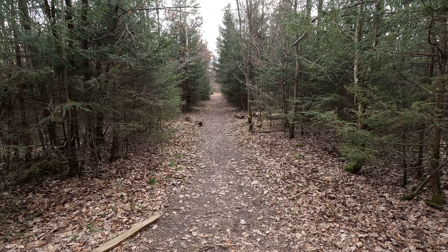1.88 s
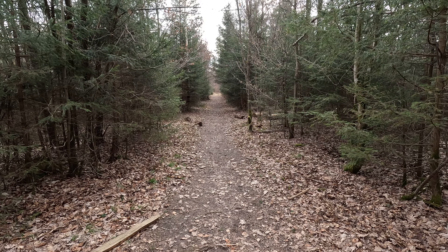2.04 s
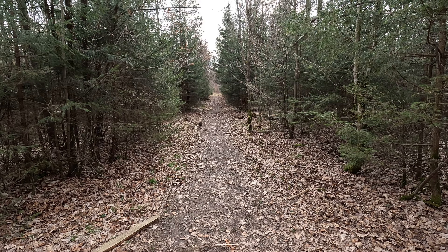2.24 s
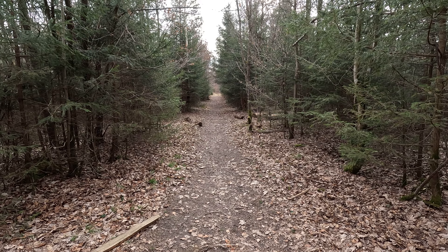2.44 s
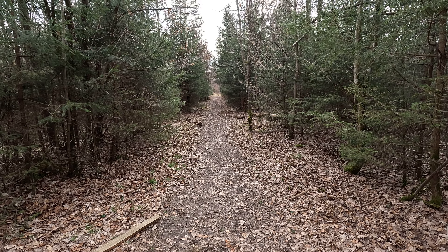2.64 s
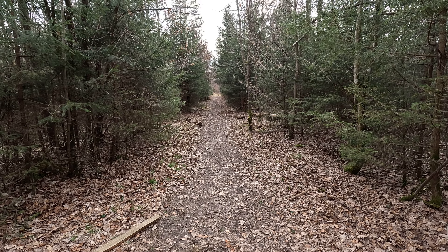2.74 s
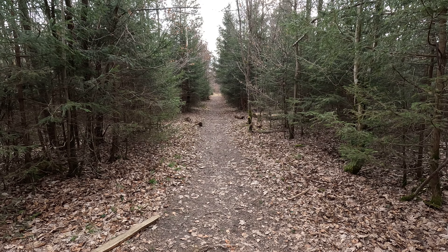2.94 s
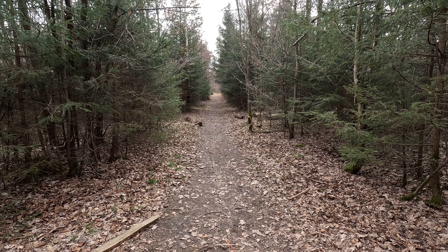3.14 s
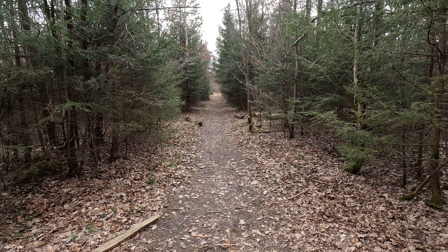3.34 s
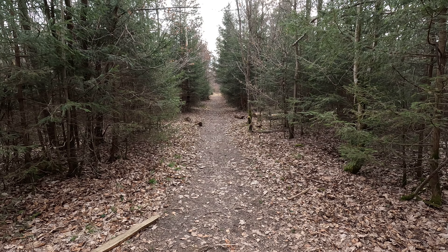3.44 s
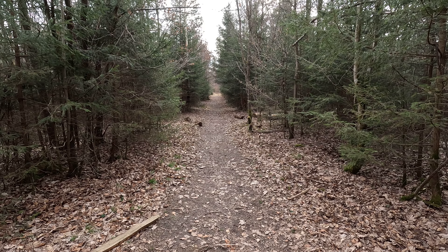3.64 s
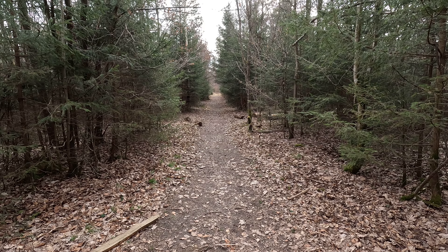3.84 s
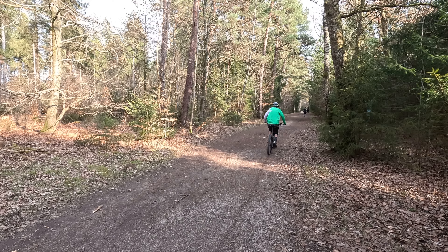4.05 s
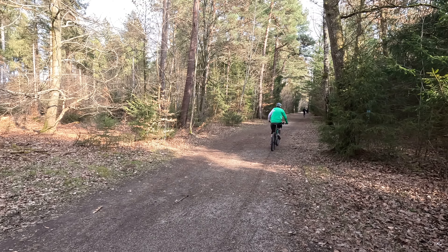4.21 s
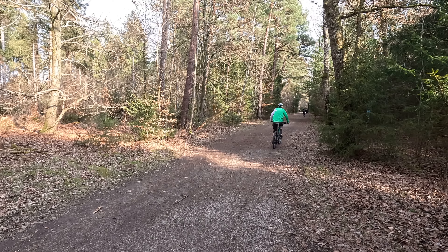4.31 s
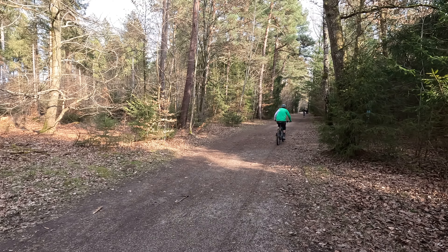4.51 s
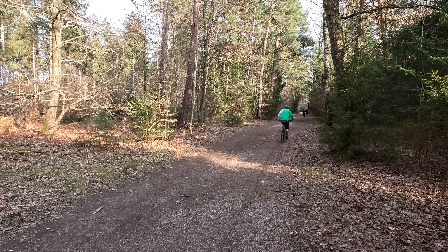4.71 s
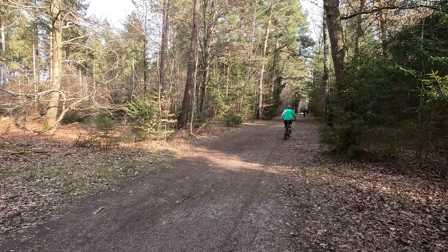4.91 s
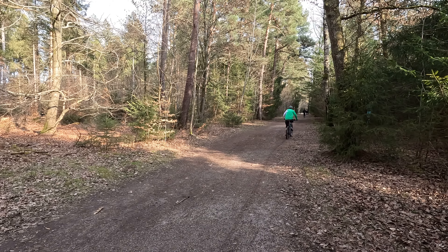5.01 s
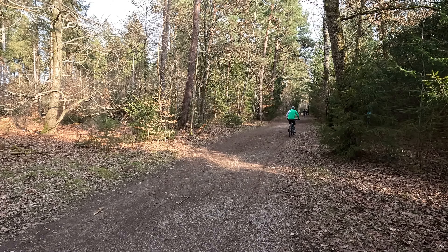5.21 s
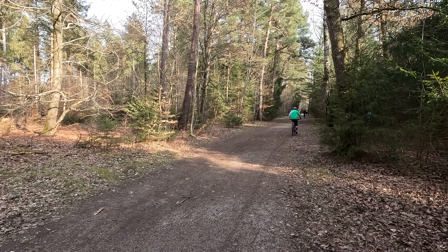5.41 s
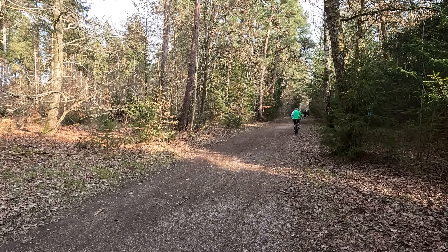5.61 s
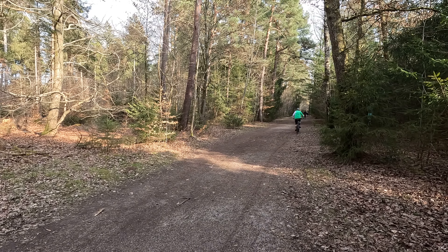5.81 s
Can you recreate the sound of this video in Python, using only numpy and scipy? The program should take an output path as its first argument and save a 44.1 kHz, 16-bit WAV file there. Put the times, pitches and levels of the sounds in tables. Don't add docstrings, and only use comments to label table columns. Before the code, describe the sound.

Woodland birds trill and whistle over soft wind and a distant drone, then a bicycle crunches away over loud gravel.

```python
import sys
import numpy as np
from scipy import signal
from scipy.fft import rfft, irfft, next_fast_len
from scipy.io import wavfile
from scipy.ndimage import uniform_filter1d, map_coordinates

SR = 44100
rng = np.random.default_rng(int(sys.argv[2]) if len(sys.argv) > 2 else 0)


def linear_from_db(decibels):
    return 10 ** (np.asarray(decibels, float) / 20)


def output_pcm(signal):
    pcm = np.clip(np.atleast_2d(signal).T, -1, 1) * 32767
    wavfile.write(sys.argv[1], SR, np.round(pcm).astype(np.int16))


N = 258867

# (frequency [Hz], density [dB per Hz])
WIND_SPECTRUM = [(12, -21), (20, 5), (38, -3.5), (54, -1.5), (68, -9.5), (110, -16), (140, -39),
                 (240, -120)]
# (frequency [Hz], density [dB per Hz])
DRONE_SPECTRUM = [(53, -51), (90, -25), (119, -19.5), (148, -7), (182, 2), (330, -15.5), (430, -55),
                  (730, -120)]
# (frequency [Hz], density [dB per Hz])
WHIRR_SPECTRUM = [(160, -25), (270, 2.5), (297, -5.5), (387, -3), (517, -13.5), (800, -29.5), (1040, -67.5),
                  (1760, -120)]
# (frequency [Hz], density [dB per Hz])
AIR_SPECTRUM = [(500, -19), (700, -10), (850, -11), (1030, -3), (1400, -4), (2000, -2), (3000, -19.5),
                (4000, -25), (5700, -22.5), (7600, -25.5), (9000, -36.5), (12000, -41.5), (14500, -62),
                (16000, -120)]
# (frequency [Hz], density [dB per Hz])
LEAF_SPECTRUM = [(900, -22), (2500, -2.5), (5000, -1), (7500, -13), (10000, -25), (14000, -39.5)]
# (time [s], rise [dB])
GUSTS = [(.2, 4.5), (1.1, 5), (1.29, 13.5), (1.5, 11.5), (1.7, 7), (1.9, 4), (2.33, 6), (2.76, 10.5),
         (3.0, 4.5), (3.33, 9.5), (3.58, 9), (3.84, 6)]
# (time [s], level [dB])
DRONE_LEVEL = [(0, -63.5), (.25, -58), (.9, -51.5), (1.27, -59.5), (1.8, -53), (2.2, -53), (2.7, -52.5),
               (3.3, -56), (3.45, -59), (3.7, -60.5), (4.05, -55)]
# (time [s], length [s], level [dB])
LEAF_STIRS = [
    (0.666, 0.095, -70),
    (1.22, .06, -78),
    (2.767, 0.14, -75),
]
# (frequency [Hz], left-right correlation [0..1])
LIKENESS = [(60, 0.97), (240, 0.96), (490, 0.8), (990, 0.75), (2000, 0.25), (8000, 0.8)]
# (frequency [Hz], t60 [s])
TRUNK_T60 = [(1500, 0.92), (4000, 0.73), (8000, 0.46), (13000, 0.35)]

# (start [s], end [s], first pitch [Hz], last pitch [Hz], level [dB])
FAR_WARBLES = [(.9, 1.072, 1956, 2060, -72), (1.15, 1.33, 2710, 2760, -71.5),
               (1.196, 1.34, 2940, 2880, -72), (1.14, 1.385, 2424, 2520, -72),
               (1.474, 1.531, 2352, 1963, -68.5), (1.5, 1.724, 2193, 2038, -71),
               (2.081, 2.183, 1599, 1867, -67), (2.16, 2.209, 5690, 4350, -74.5),
               (2.243, 2.426, 2207, 2170, -72.5), (2.359, 2.476, 2396, 2387, -71),
               (2.428, 2.53, 6880, 6090, -80), (2.592, 2.75, 6620, 6000, -85.5),
               (3.201, 3.466, 1876, 1783, -69.5), (3.451, 3.557, 2186, 2310, -70.5),
               (3.66, 3.717, 2345, 2514, -63.5), (3.932, 4.05, 3920, 3740, -80.5),
               (2.0, 2.15, 524.5, 547, -72), (3.741, 3.855, 2600, 2930, -70), (3.499, 3.6, 2690, 2680, -70),
               (3.56, 3.705, 3260, 3350, -82), (3.6, 3.72, 2960, 3000, -75.5),
               (3.78, 3.86, 3130, 3050, -79), (3.55, 3.656, 1887, 2066, -62.5),
               (3.79, 3.867, 2756, 2644, -68)]
# (start [s], end [s], first pitch [Hz], last pitch [Hz], level [dB])
FAR_WHISTLES = [(.66, .73, 2020, 1970, -77), (.745, .82, 1970, 1965, -70), (.83, .885, 1950, 1970, -71),
                (.9, 1.1, 2040, 2130, -73), (1.95, 2.2, 505, 560, -76), (2.17, 2.26, 735, 750, -77),
                (.74, .78, 2300, 2640, -77), (.78, .885, 2665, 2670, -75), (.895, 1.065, 2660, 2645, -72),
                (1.49, 1.62, 2290, 2150, -74), (1.5, 1.72, 2050, 1990, -75), (.84, 1.0, 4910, 4880, -78),
                (1.3, 1.52, 5330, 5450, -71), (2.62, 2.77, 1985, 1950, -65.5),
                (2.82, 3.02, 2460, 2540, -75.5), (3.08, 3.2, 1905, 1890, -75), (3.76, 3.8, 3500, 3490, -75),
                (3.95, 4.01, 4490, 4490, -76), (3.715, 3.755, 2500, 2540, -63),
                (3.75, 3.825, 2660, 2810, -65), (3.52, 3.625, 2730, 2690, -72)]
# (time [s], pitch [Hz], level [dB])
THRUSH_NOTES = [
    [(3.655, 2289, -67), (3.679, 2198, -60), (3.717, 2146, -51), (3.741, 2133, -64), (3.751, 2140, -53),
     (3.891, 2070, -53), (3.915, 2085, -66)],
    [(3.94, 2116, -75), (3.946, 2276, -66), (3.956, 2276, -52.5), (3.986, 2266, -50), (4.0, 2170, -49),
     (4.056, 2148, -47.5), (4.062, 2121, -63)],
]
# (start [s], end [s], first pitch [Hz], last pitch [Hz], level [dB])
CREST_BURSTS = [
    (2.331, 2.423, 7450, 7950, -77),
    (2.508, 2.625, 7290, 8340, -69.5),
    (2.679, 2.798, 7860, 7980, -71.5),
    (2.831, 2.931, 7400, 7340, -69.5),
]
# (time [s], height [Hz])
CREST_FLICKS = [(2.368, 447), (2.397, 447), (2.409, 450), (2.508, 1050), (2.547, 1035), (2.582, 940),
                (2.611, 302), (2.684, 745), (2.729, 690), (2.762, 303), (2.838, 600), (2.85, 552),
                (2.884, 596), (2.913, 400)]
# (time after start [s], pitch [Hz], level [dB])
TIT_MOTIF = [
    [(-.02, 5154, -1.5), (.02, 5230, 2), (.08, 5242, 2), (.135, 5254, -1), (.147, 5870, -3)],
    [(.218, 6030, -12), (.228, 4960, 2.5), (.25, 3260, -12), (.262, 2900, -22)],
    [(.298, 3350, -13), (.315, 4360, 0), (.333, 5130, 3), (.341, 6120, -6)],
]
# (start [s], level [dB])
TIT_STARTS = [
    (0.364, -69.5),
    (0.795, -66),
    (1.222, -65.5),
    (1.661, -66.5),
]
# (time [s], pitch [Hz], level [dB])
TIT_LAST = [
    [(3.89, 5170, -68), (3.915, 4950, -65.5), (3.93, 5880, -75)],
    [(3.998, 5200, -68.5), (4.02, 4270, -71), (4.03, 3900, -71.5)],
]
# (time [s], pitch [Hz], level [dB])
LOW_NOTE_TAIL = [(-.01, 3007, -52), (.004, 3054, -49.5), (.009, 2810, -49.5), (0.014, 2220, -58.5)]
# (time after start [s], pitch [Hz], level [dB])
PEAKED_NOTE = [(0, 2300, -17), (.008, 2980, -9), (.0135, 3730, -2), (.021, 3830, 0), (.0265, 3740, -1.5),
               (.032, 2850, -7), (.038, 2250, -16)]
# (time after start [s], pitch [Hz], level [dB])
SQUEAK_NOTE = [(-.002, 3820, -24.5), (.004, 3890, -9), (.012, 4500, -13.5)]
# (start [s], level [dB], squeak re note [dB], top pitch [Hz])
TRILL_NOTES = [
    (.039, -43.5, 2.5, 3850),
    (0.097, -43.5, -0.5, 3790),
    (0.159, -45, -2, 3845),
]
# (time [s], pitch [Hz], level [dB])
FLOURISH_NOTES = [
    [(.284, 4100, -52), (.289, 6100, -67), (.294, 6620, -51.5), (.308, 7050, -52.5), (.325, 7340, -56),
     (.345, 8050, -86)],
    [(.4, 5200, -65), (.406, 8700, -77.5), (.417, 7000, -55.5), (.43, 6200, -54), (.45, 5610, -63.5),
     (.475, 5544, -50.5), (.489, 5340, -48.5), (.495, 5010, -47), (.501, 4020, -50.5)],
]
# (frequency [Hz], density [dB per Hz])
EARLIER_ECHO = [(2000, -61.5), (2500, -3), (3200, 7.5), (3700, -23), (4500, 4), (6000, -12), (8000, -23.5),
                (13000, -46.5)]

# (time [s], peak [dB], sparkle [dB], ping
# pitch [Hz])
FLICKED_STONES = [(4.2597, -46, -90, 3520), (4.278, -37, -90, 5700), (4.2836, -28.5, -77.5, 4040),
                  (4.2838, -31, -84, 5300), (4.285, -31, -90, 1310), (4.2879, -36, -86, 3160),
                  (4.295, -40, -86, 2170), (4.3012, -43, -78, 4000), (4.3615, -42, -89, 3700),
                  (4.4243, -41, -81, 5200), (4.5086, -46, -77, 6000), (4.5675, -50, -86.5, 4900),
                  (4.59, -51, -86, 3500), (4.7057, -46, -77, 5000), (4.7935, -49.5, -90, 2730),
                  (4.9065, -56, -83.5, 3500), (4.9565, -48, -81, 5500), (5.0659, -47.5, -88, 3480),
                  (5.1013, -46, -70, 3580), (5.133, -50.5, -79, 3500), (5.215, -54, -80, 3500),
                  (5.26, -56, -80, 2730), (5.2824, -51, -74, 3420), (5.3727, -48, -74, 2720),
                  (5.4979, -46, -75, 2730), (5.5702, -56, -83, 2810), (5.6101, -45, -70, 4500),
                  (5.6204, -44, -77, 2640), (5.6682, -48, -78, 3000), (5.7423, -48, -81, 2730),
                  (5.8496, -50, -88, 2680), (5.8682, -48.5, -60.5, 5000)]
# (time [s], peak [dB])
STONE_KNOCKS = [(4.223, -39), (4.239, -34), (4.269, -33), (4.332, -30), (4.394, -23.5), (4.459, -28),
                (4.504, -34), (4.518, -29), (4.57, -21), (4.61, -32.5), (4.644, -29), (4.674, -31.5),
                (4.732, -25.5), (4.758, -33.5), (4.805, -26), (4.838, -28), (4.898, -28), (4.943, -29.5),
                (4.963, -29), (5.005, -33), (5.034, -30.5), (5.056, -34), (5.123, -39), (5.15, -36),
                (5.286, -38), (5.334, -42), (5.353, -35.5), (5.397, -33), (5.52, -40.5), (5.593, -41),
                (5.612, -28.5), (5.684, -35), (5.697, -36), (5.727, -32.5), (5.774, -33)]
# (time [s], peak [dB])
CASING_JOLTS = [(4.242, -17.5), (4.339, -22.5), (4.381, -28), (4.409, -19.5), (4.441, -23), (4.598, -27),
                (4.612, -25), (4.645, -25), (4.709, -21), (4.729, -27), (4.749, -26), (4.779, -25.5),
                (4.81, -30), (5.005, -25), (5.039, -25), (5.139, -28), (5.219, -35), (5.429, -26),
                (5.479, -33), (5.562, -41), (5.605, -29.5), (5.631, -26)]
# (time [s], rise [dB])
RUTS = [(4.24, -7), (4.38, 3.5), (4.642, 4.5), (4.75, 6), (4.82, 3), (5.03, 5.5), (5.158, 4.5), (5.63, 4),
        (5.83, 2.5)]
# (time [s], rise [dB])
LOOSE_GRAVEL = [(4.292, 4.5), (4.57, -1), (4.71, 0), (4.965, -1.5), (5.11, 0), (5.628, 10.5), (5.82, 3)]
# (frequency [Hz], width [Hz], level [dB])
CASING_MODES = [
    (127.3, 18.3, -3.5),
    (216.3, 54, 2),
    (288, 80, -1.5),
]
# (frequency [Hz], width [Hz], level [dB])
SPOKE_MODES = [(2730, 130, 0), (3520, 260, -3), (4900, 400, -7), (1350, 60, 1.5)]
# (frequency [Hz], density [dB per Hz])
CRUNCH_SPECTRUM = [(220, -14.5), (380, -7), (424, -11), (537, 1), (694, -0.5), (758, -3), (853, -2),
                   (924, -7), (1230, -12), (1400, -8), (1660, -12.5), (1860, -24.5), (2200, -27),
                   (2860, -51), (4840, -120)]
# (frequency [Hz], density [dB per Hz])
GRIT_SPECTRUM = [(1200, -17), (1800, 0.5), (2500, -2.5), (2730, -6), (3100, -9), (3600, -8), (4900, -14),
                 (6000, -18), (7500, -21), (8300, -40), (9500, -33.5), (10600, -32), (12000, -51),
                 (14500, -50), (16000, -120)]
# (frequency [Hz], density [dB per Hz])
THUD_SPECTRUM = [(11, -47.5), (18, 4.5), (48, 6.5), (86, 0.5), (100, -19), (130, -53.5), (220, -120)]


def unit(x):
    return x / np.sqrt(np.mean(x ** 2) + 1e-20)


def along(points, hz):
    f, v = np.transpose(points)
    return np.interp(np.log(hz + 1), np.log(f + 1), v)


def swells(rows, half_s):
    t = np.arange(N) / SR
    return sum(db * np.exp(-((t - s) / half_s) ** 2) for s, db in rows)


def wobble(rate_hz, size=N):
    at = np.arange(0, size + 16, 16)
    knots = rng.standard_normal(int(size * rate_hz / SR) + 5)
    coarse = map_coordinates(knots, [at * rate_hz / SR])
    return np.interp(np.arange(size), at, coarse)


def filtered(x, response):
    m = next_fast_len(N + SR // 2)
    return irfft(rfft(x, m) * response(np.fft.rfftfreq(m, 1 / SR)), m)[..., :N]


def causal(spectrum):
    def response(hz):
        cepstrum = irfft(np.log(linear_from_db(along(spectrum, hz)) + 1e-4))
        half = len(cepstrum) // 2
        cepstrum[1:half] *= 2
        cepstrum[half + 1:] = 0
        return np.exp(rfft(cepstrum))
    return response


def resonant(f, peaks):
    total = 0
    for k, (hz, width_hz, db) in enumerate(peaks):
        damping = 1j * f * width_hz
        total = total + (-1) ** k * linear_from_db(db) * damping / (hz * hz - f * f + damping)
    return total


def rush(spectrum, patchy_db):
    z = signal.stft(rng.standard_normal((2, N)), nperseg=512)[2]
    field = uniform_filter1d(rng.standard_normal(z.shape[1:]), 5, axis=0)
    field = unit(uniform_filter1d(field, 12, axis=1))
    pair = signal.istft(z * linear_from_db(patchy_db * field), nperseg=512)[1][:, :N]

    def mid_side(hz):
        angle = np.arccos(np.clip(along(LIKENESS, hz), -1, 1)) / 2
        return linear_from_db(along(spectrum, hz)) * [np.cos(angle), np.sin(angle)]
    mid, side = filtered(pair, mid_side)
    return unit(np.array([mid + side, mid - side]))


def add_note(track, note, start_s=0, db=0, overtone_db=-45, warble_hz=0):
    s, hz, level_db = np.transpose(note)
    t = np.arange(s[0], s[-1], 1 / SR)
    glide_hz = uniform_filter1d(np.interp(t, s, hz), size=90, mode="nearest")
    phase = 2 * np.pi * np.cumsum(glide_hz + warble_hz * wobble(130, size=len(t))) / SR
    now_db = np.interp(t, s, level_db)
    overtones = linear_from_db(overtone_db + 1.2 * (level_db.max() - now_db))
    wave = np.sin(phase) + overtones * (np.sin(2 * phase) + linear_from_db(-32) * np.sin(3 * phase))
    ends = np.clip(np.minimum(t - s[0], s[-1] - t) / 0.0012, 0, 1)
    at = round((s[0] + start_s) * SR) + np.arange(len(t))
    keep = (at >= 0) & (at < N)
    track[at[keep]] += (np.sqrt(2) * wave * ends * linear_from_db(db + now_db))[keep]


def placed(x, dry_db, wet_db, pan_db, lag_ms, blur_hz):
    hz, t, z = signal.stft(rng.standard_normal((2, 36000)), SR, nperseg=256)
    decay = linear_from_db(-60 * t / along(TRUNK_T60, hz)[:, None])
    tail = signal.istft(z * decay, SR, nperseg=256)[1]
    tail[1] = 0.82 * tail[0] + 0.52 * tail[1]
    slip = 1.5 * wobble(blur_hz)
    blurred = x * np.cos(slip) - filtered(x, lambda f: -1j) * np.sin(slip)
    delayed = np.pad(blurred, (500, 0))[None]
    wet = signal.fftconvolve(delayed, tail / np.linalg.norm(tail[0]), axes=1)[:, :N]
    side = np.array([[.5], [-.5]])
    direct = filtered(x, lambda f: linear_from_db(side * pan_db) * np.exp(-2j * np.pi * f * side * lag_ms / 1000))
    return linear_from_db(dry_db) * direct + linear_from_db(wet_db) * wet


def wood():
    t = np.arange(N) / SR
    wind_db = -60.5 + swells(GUSTS, half_s=0.099)
    drone_db = np.interp(t, *np.transpose(DRONE_LEVEL))
    whirr_db = -66.5 + 10.5 * np.exp(-(t / 1.0) ** 2)
    air_db = -75 + 6.5 / (1 + np.exp(-(t - 0.71) / 0.045))
    stirs = sum(linear_from_db(db) * (t > s) * np.exp(-(np.abs(t - s) / length_s) ** 3)
                for s, length_s, db in LEAF_STIRS)
    wind = linear_from_db(wind_db + 1.2 * wobble(21)) * rush(WIND_SPECTRUM, patchy_db=0)
    drone = linear_from_db(drone_db + 1.3 * wobble(14)) * rush(DRONE_SPECTRUM, patchy_db=0)
    whirr = linear_from_db(whirr_db + 1.67 * wobble(20.87)) * rush(WHIRR_SPECTRUM, patchy_db=1.0)
    air = linear_from_db(air_db) * rush(AIR_SPECTRUM, patchy_db=2.5)
    return wind + drone + whirr + air + stirs * rush(LEAF_SPECTRUM, patchy_db=0)


def far_note(s, end_s, hz, last_hz, db):
    attack = 0.2
    top = (s + attack * (end_s - s), hz + attack * (last_hz - hz), db + 3)
    return [(s, hz, db - 1), top, (end_s, last_hz, db - 3)]


def thrushes():
    near, clear, blurred = np.zeros(N), np.zeros(N), np.zeros(N)
    for note in THRUSH_NOTES:
        add_note(near, note, warble_hz=13.0)
    for row in FAR_WHISTLES:
        add_note(clear, far_note(*row), warble_hz=.004 * row[2])
    for row in FAR_WARBLES + FAR_WARBLES:
        add_note(blurred, far_note(*row), warble_hz=0.0339 * row[2])
    far = placed(clear, dry_db=0, wet_db=-7, pan_db=-.4, lag_ms=.07, blur_hz=70)
    far += placed(blurred, dry_db=-7.5, wet_db=-3.5, pan_db=-1.5, lag_ms=0.065, blur_hz=44.6)
    return placed(near, dry_db=0.2, wet_db=-6.5, pan_db=-4.0, lag_ms=0.11, blur_hz=60.3) + far


def twitter(s, end_s, hz, last_hz, db):
    t = np.linspace(s, end_s, num=80)
    flick_half_s = .0075
    flicked_hz = sum(up_hz * np.exp(-np.abs((t - at) / flick_half_s) ** 1.6) for at, up_hz in CREST_FLICKS)
    arch = np.abs(2 * (t - s) / (end_s - s) - 1) ** 3
    return np.transpose([t, np.linspace(hz, last_hz, num=80) + flicked_hz, db - 6 * arch])


def small_birds():
    tit, crest = np.zeros(N), np.zeros(N)
    for s, db in TIT_STARTS:
        for note in TIT_MOTIF[2 if s < .5 else 0:]:
            add_note(tit, note, s, db, warble_hz=24.2)
    for note in TIT_LAST:
        add_note(tit, note)
    for burst in CREST_BURSTS:
        add_note(crest, twitter(*burst))
    aside = placed(tit, dry_db=-6, wet_db=-1, pan_db=-2.5, lag_ms=.09, blur_hz=40)
    return aside + placed(crest, dry_db=-2.5, wet_db=-7.5, pan_db=3, lag_ms=0.0098, blur_hz=80)


def near_bird():
    song = np.zeros(N)
    add_note(song, LOW_NOTE_TAIL, overtone_db=-12.5)
    for s, db, squeak_db, top_hz in TRILL_NOTES:
        peaked = np.array(PEAKED_NOTE) * [1, top_hz / PEAKED_NOTE[3][1], 1]
        add_note(song, peaked, s, db, overtone_db=-27, warble_hz=45)
        add_note(song, SQUEAK_NOTE, s, db + squeak_db)
    for note in FLOURISH_NOTES:
        add_note(song, note, overtone_db=-70)
    octave = np.array(FLOURISH_NOTES[1][3:7]) * [1, 2, 1]
    add_note(song, octave, db=-26, overtone_db=-70)
    add_note(song, octave * [1, -1, 1] + [0, 2 * 12000, 0], db=-34, overtone_db=-70)
    doubled = filtered(song, lambda f: 1 + linear_from_db(-0.5) * np.exp(-2j * np.pi * f * .0075))
    earlier = linear_from_db(-53.5 - 60 * np.arange(N) / SR / 0.92) * rush(EARLIER_ECHO, patchy_db=2.5)
    return placed(doubled, dry_db=0.0, wet_db=-11.5, pan_db=1.0, lag_ms=0.0068, blur_hz=380) + earlier


def flicked_stones():
    low, high, t = np.zeros(N + SR), np.zeros(N + SR), np.arange(SR // 20) / SR
    rise = 1 - np.exp(-t / 0.00061)
    for s, db, sparkle_db, hz in FLICKED_STONES:
        crackle = linear_from_db(-60 * t / 0.022) * rng.standard_normal((2, len(t))) * rise
        ping = 0.82 * linear_from_db(-60 * t / 0.019) * np.sin(2 * np.pi * hz * t) * rise
        at = round(s * SR)
        low[at:][:len(t)] += linear_from_db(db) * (ping + 0.96 * crackle[0])
        high[at:][:len(t)] += linear_from_db(sparkle_db + 12.5) * crackle[1]

    def dull(f):
        return 1 / (1 + 1j * f / 5500) ** 2 / (1 + (f / 7000) ** 8) / (1 + (900 / (f + 1)) ** 4)

    def bright(f):
        return 1 / (1 + (9000 / (f + 1)) ** 8) / (1 + (f / 11500) ** 6)
    return filtered(low[:N], dull) + filtered(high[:N], bright)


def knocks():
    blows, jolts, t = np.zeros(N + SR), np.zeros(N), np.arange(SR // 40) / SR
    for s, db in STONE_KNOCKS:
        splinters = 0.18 * linear_from_db(-60 * t / 0.022) * rng.standard_normal(len(t))
        blows[round(s * SR):][:len(t)] += linear_from_db(db + 25) * (splinters + (t == 0))
    for s, db in CASING_JOLTS:
        jolts[round(s * SR)] = linear_from_db(db + 38.5)
    drummed = filtered(jolts, lambda f: resonant(f, CASING_MODES) / (1 + 1j * f / 450) ** 2)
    return filtered(blows[:N], causal(CRUNCH_SPECTRUM)) + drummed


def gravel(rate_hz, spread_db, smooth, knobs):
    tread_hz = 65.25
    turn = np.cumsum(tread_hz * (1 + .06 * wobble(12))) / SR % 1
    chance = rate_hz / SR * (1 - knobs + knobs * 6 * np.exp(-6 * turn))
    struck = rng.random(N) < chance
    blows = struck * linear_from_db(spread_db * rng.exponential(size=N)) * rng.choice([-1, 1], size=N)
    return unit(blows) + smooth * rng.standard_normal(N)


def tyres():
    start_s, aside_m, speed_m_s, fade_in_s = 4.245, 3.72, 5.06, 0.079
    since_s = np.arange(N) / SR - start_s
    away_db = -10 * np.log10(1 + (speed_m_s * since_s / aside_m) ** 2)
    fade_db = -40 * np.clip(-since_s / fade_in_s, 0, 2) ** 2
    ruts_db, loose_db = swells(RUTS, half_s=0.038), swells(LOOSE_GRAVEL, half_s=0.017)
    spray_db = 3.5 * np.exp(-abs(since_s) / 0.16)
    drum_db = -35 + ruts_db + 1.05 * away_db + fade_db
    crunch_db = -42.5 + loose_db + 1.16 * away_db + fade_db
    grit_db = -61.5 + loose_db + spray_db + 1.28 * away_db + fade_db
    thud_db = -44.5 + 0.36 * loose_db + 1.7 * wobble(9) + 0.74 * away_db + fade_db

    bumps = wobble(35)
    stones = gravel(rate_hz=500, spread_db=1.0, smooth=1.2, knobs=.85) * linear_from_db(1.2 * bumps)
    casing = filtered(stones, lambda f: resonant(f, CASING_MODES) / (1 + (f / 420) ** 4))
    drum = linear_from_db(drum_db) * unit(casing)
    crunch = linear_from_db(crunch_db) * unit(filtered(stones, causal(CRUNCH_SPECTRUM)))

    fine = gravel(rate_hz=3100, spread_db=0.0, smooth=1.2, knobs=0.28)
    fine = fine * linear_from_db(0.22 * bumps + 1.0 * wobble(60))
    dust_hz = 8000

    def sand_and_dust(f):
        ringing = causal(GRIT_SPECTRUM)(f) * (1 + np.abs(resonant(f, SPOKE_MODES)))
        return ringing * [f < dust_hz, f >= dust_hz]
    sand, dust = unit(filtered(fine, sand_and_dust))
    dust_db = 4 * wobble(19) + 2 * since_s
    grit = np.sqrt(2) * linear_from_db(grit_db) * (sand + dust * linear_from_db(dust_db))
    thud = filtered(rng.standard_normal(N), lambda f: linear_from_db(along(THUD_SPECTRUM, f)))
    return drum + crunch + grit + linear_from_db(thud_db) * unit(thud)


def scene():
    fade_s, mute_s, resume_s = 4.053, 4.068, 4.172
    t = np.arange(N) / SR
    forest = wood() + thrushes() + small_birds() + near_bird()
    track = (flicked_stones() + knocks() + tyres()) * np.clip((t - resume_s) / 0.016, 0, 1)
    return forest * np.clip((mute_s - t) / (mute_s - fade_s), 0, 1) ** 2 + track


def low_pass(x):
    return signal.sosfilt(signal.butter(12, 14836, fs=SR, output="sos"), x)


def record(dry):
    return low_pass(dry)


dry = scene()
out = record(dry)
output_pcm(out)
```